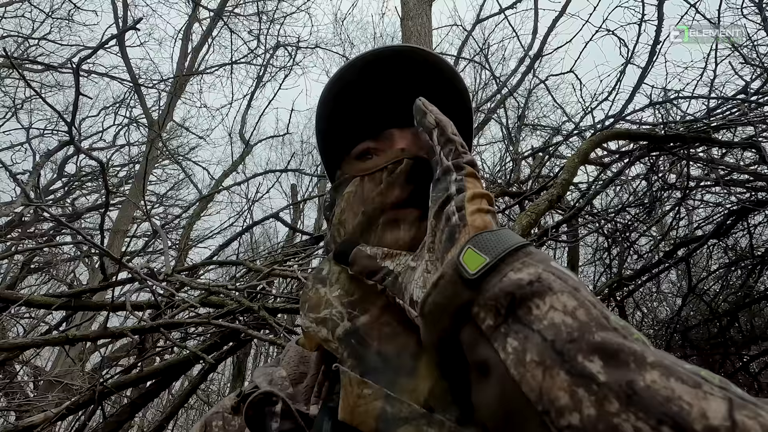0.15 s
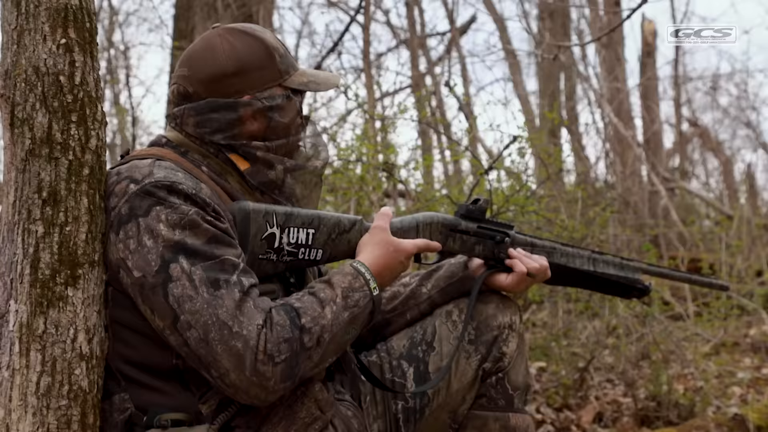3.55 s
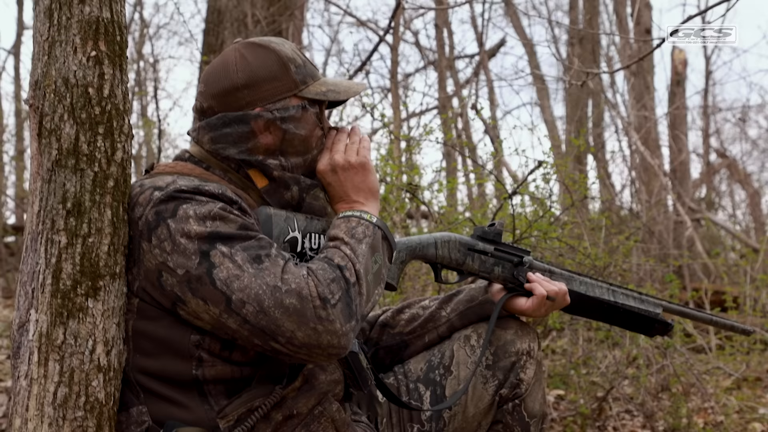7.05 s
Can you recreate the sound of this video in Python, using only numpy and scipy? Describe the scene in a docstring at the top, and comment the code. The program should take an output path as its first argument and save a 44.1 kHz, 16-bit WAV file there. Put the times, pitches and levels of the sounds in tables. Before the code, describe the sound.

Twelve short, raspy hen turkey yelps from a reed mouth call come about three a second over near silence. Leaf hiss and soft wind rumble rise, a faraway tom gobbles in chopped, rattling notes, and a thin insect trill appears with dry twig ticks. A lower, clearer run of yelps starts quietly and grows strong and close, then a second distant gobble follows. Bare spring woods, slight echo, wind bumping the microphone.

```python
"""A raspy run of hen turkey yelps from a latex reed call in the mouth, then a clearer, nearer run.
Reed partials, stuttering and slipping, mix with gated air noise. A far tom gobbles back after each run:
chopped short notes. A far bird whistles once; leaf hiss and an insect trill rise after the first run.
Shaped noise makes the wind on the microphone; twigs and gear tick and knock. Echoes leave a faint tail in
bare spring woods."""
import sys
import numpy as np
from scipy import signal
from scipy.fft import rfft, irfft, next_fast_len
from scipy.io import wavfile
from scipy.ndimage import uniform_filter1d

SR = 44100
rng = np.random.default_rng(int(sys.argv[2]) if len(sys.argv) > 2 else 0)


def volts_from_decibels(level):
    """Turn decibel levels (scalar or array-like) into linear amplitude factors."""
    exponent = np.asarray(level, float) / 20
    return 10 ** exponent


def transcribe(signal):
    """Save signal, clipped to [-1, 1], as a 16-bit WAV file at the path in sys.argv[1]."""
    frames = np.atleast_2d(signal).T
    limited = np.clip(frames, -1, 1)
    pcm = np.round(limited * 32767).astype(np.int16)
    wavfile.write(sys.argv[1], SR, pcm)


N = 393660

# The yelps of each run, before the manner below bends them:
# start_s, length_s, effort_db, pitch_hz, sag_hz_per_s, reed_steadies_s, reed_breaks_s (both after the start)
RASPY_YELPS = [(-.035, .097, -18.5, 810, 600, .02, .068), (.321, .101, -16.5, 782, 450, .004, .085),
               (.665, .095, -16, 765, -700, .012, .08), (.972, .091, -17, 775, -250, .032, .078),
               (1.284, .093, -17, 785, 120, .008, .088), (1.603, .098, -17, 800, -700, .005, .06),
               (1.922, .098, -18, 810, 100, .032, .065), (2.236, .101, -16, 802, 220, .035, .095),
               (2.578, .093, -16.5, 825, 350, .022, .083), (2.920, .1, -17.5, 820, 50, .07, .071),
               (3.254, .097, -17, 840, 50, .06, .061), (3.577, .103, -18.5, 860, 100, .035, .06)]
CLEAR_YELPS = [(6.305, .045, -26, 600, 250, .014, .04), (6.590, .052, -10.5, 678, 1000, .004, .05),
               (6.858, .053, -10.5, 652, 250, .004, .05), (7.117, .073, -5.5, 640, 650, .025, .07),
               (7.405, .071, -5.5, 634, 380, .017, .068), (7.676, .077, -2.5, 636, 150, .024, .056),
               (7.976, .077, -2, 655, 250, .023, .036), (8.302, .072, -7, 690, 800, .02, .07)]
# Manner of a run: rise_s, fall_s, silence_db, level_before_steadying_db, level_after_breaking_db,
# swell_db_per_s (positive swells, negative fades), pitch_lift (share of pitch), settling_s,
# rasp_steady (0-1), rasp_unsteady (0-1), puff_db, waver_db, growth of the unsteady rasp from yelp to yelp
RASPY_MANNER = (.006, .018, -30, -2, -3.5, 25, .05, .004, .31, .6, 4, 2.1, .03)
CLEAR_MANNER = (.006, .019, -24, -14, -1.5, -75, .19, .007, .11, .55, 1, .5, .025)
# Mouth and cupped hand, for the reed tone and for the rasp: frequency_hz, relative level_db
RASPY_TONE = [(780, -23.5), (1560, 2), (2340, -17.5), (3120, -37.5), (3900, -31.5), (4680, -33),
              (5460, -52.5), (7020, -54), (9360, -55), (12480, -64)]
RASPY_AIR = [(400, -76.5), (650, -42), (930, 1), (1200, -6.5), (1600, 15), (1900, 3), (2400, -22.5),
             (3100, -50.5), (4300, -8.5), (5000, -25), (5900, -54.1), (7800, -45.5), (11000, -44.5),
             (14000, -65)]
CLEAR_TONE = [(640, -15), (770, -23), (1260, -0.5), (1890, -17.5), (2520, -29.5), (3150, -34.5),
              (3780, -47), (4410, -54.5), (5670, -55)]
CLEAR_AIR = [(400, -42.5), (650, -21), (1050, -12.5), (1300, 2), (1600, -15), (2000, -13.5), (3500, -50.5),
             (8000, -68.5)]
# Gobbles, before distance softens them: start_s, effort_db, stretch in time (a ratio)
GOBBLES = [(4.054, -32, 1.0), (8.614, -25, 1.08)]
# Course of a gobble, before stretching: time_s, level_db, pitch_hz, throat_resonance_hz
GOBBLE_COURSE = [(0, -1, 590, 1650), (.085, 0, 612, 1700), (.11, -3, 650, 1290), (.17, -8, 645, 1290),
                 (.19, -6, 530, 1050), (.25, -3, 535, 1040), (.33, -9, 570, 640), (.41, -9, 500, 960),
                 (.6, -12, 505, 940), (.8, -14, 540, 1300), (.93, -34, 560, 1700), (1.08, -19, 590, 1780),
                 (1.17, -22, 600, 1780)]
# Throat of the tom: frequency_hz, relative level_db
TOM_THROAT = [(450, -11), (600, -5), (1050, -2), (1800, -2), (2300, -7), (3000, -11), (4000, -8),
              (5000, -15), (7000, -43)]
# Fading of echoes in the trees: frequency_hz, relative fading time (a ratio, scaled for each sound)
TREE_FADING = [(500, 1.1), (1500, 0.9), (3000, 0.3), (8000, 0.43)]
# Glide of the far bird: time_s, pitch_hz, level_db
BIRD_GLIDE = [(.06, 820, -76), (.1, 890, -71), (.22, 885, -72), (.33, 840, -74), (.42, 790, -75),
              (.52, 770, -80)]
# Overtone colour of the bird: frequency_hz, relative level_db
BIRD_TONE = [(900, -30), (2650, -12), (3550, 0), (4450, -24), (5350, -14), (7100, -15), (8000, -30)]
# Insect trill, farther insects, and a swelling mid-range wash: time_s, pitch_hz, level_db
TRILL = [(4.65, 3850, -59), (5.2, 3870, -48), (6.1, 3870, -50), (6.4, 3800, -51), (7.4, 3790, -56)]
CHORUS = [(4.4, 3433, -51.5), (5.6, 3570, -51.5), (7.4, 3500, -52.5)]
WASH = [(3.36, 1500, -64), (3.5, 1300, -55), (3.75, 1000, -48), (3.85, 900, -52), (4.05, 800, -53)]
# Dry ticks of twigs and gear: start_s, peak_db, centre_hz
TICKS = [(3.391, -52, 3770), (3.401, -42, 4200), (4.986, -27, 3900), (5.044, -27, 3300), (5.765, -23, 3000),
         (5.815, -34, 2500), (6.095, -44, 2200), (6.298, -33, 2800), (6.811, -30.5, 2400),
         (7.038, -27, 3300), (7.494, -32, 3600)]
# Hollow knocks: start_s, level_db, pitch_hz, fading_s (time to drop 60 dB)
KNOCKS = [(3.866, -31, 319, 0.14), (3.899, -39, 345, 0.23), (4.67, -27, 278, 0.053)]
# Course of the wind: time_s, rumble_db, gust_db, leaf_hiss_db
WIND = [(0, -50, -78.5, -87), (2, -54, -81, -79.5), (3.1, -49, -94.5, -79), (3.5, -50, -51, -57),
        (4, -48, -50, -57), (4.6, -38, -76, -47.5), (5.2, -44, -61, -46.5), (5.9, -44.5, -33.5, -45),
        (6.55, -43, -39.5, -47.5), (6.65, -46, -41, -46), (7.25, -36, -36, -45.5),
        (7.9, -44.5, -44.5, -46.5), (8.93, -40, -59.5, -45)]
# Colours of rumble, gusts and leaf hiss: frequency_hz, relative level_db
RUMBLE = [(20, -16), (55, 4), (95, -0.5), (200, -19), (500, -63), (1100, -120)]
GUST = [(35, -41.5), (80, -0.5), (290, 3), (550, -11.5), (1600, -27), (3300, -90)]
LEAVES = [(300, -2.5), (1000, -8.5), (2000, -13.5), (3500, -15.5), (6000, -20.5), (9000, -26.5),
          (12000, -35.5), (15000, -44)]

FLIP_S = .005  # time the reed takes to steady or break
PUFF_S = .016  # length of the opening puff
ONSET_S, ONSET_DB_PER_S = .014, 900  # faint swell ahead of each yelp
FULL_LEAD_S = .022  # a reed that steadies this late or later gets the full pitch lift
NOTES_PER_S, LATE_NOTES_PER_S, SLOWING_S = 14, 6.4, .3  # pace of gobble notes


def evened(x):
    """Scales a sound to an average (rms) strength of 1."""
    return x / np.sqrt(np.mean(x ** 2) + 1e-20)


def read(points, hz):
    """Reads a spectrum between its points on a log-frequency axis."""
    f, value = np.transpose(points)
    return np.interp(np.log(hz + 1), np.log(f + 1), value)


def add(mix, start_s, sound):
    """Mixes a sound in at a time, leaving out what falls outside."""
    at = round(start_s * SR)
    sound = sound[max(-at, 0):]
    part = mix[max(at, 0):][:len(sound)]
    part += sound[:len(part)]


def columns(rows):
    """Gives the start time and the sample-by-sample curves of a table."""
    s, *values = np.transpose(rows)
    t = np.arange(s[0], s[-1], 1 / SR)
    return [s[0]] + [np.interp(t, s, v) for v in values]


def wobble(count, rate_hz):
    """A smooth random curve of rms 1: noise with its changes faster than the rate filtered down."""
    b, a = signal.butter(2, rate_hz, fs=SR)
    smooth = signal.lfilter(b, a, rng.standard_normal(count + 2000))
    return evened(smooth)[2000:]  # skips the filter's start


def coloured(x, points):
    """Filters a sound by a spectrum, then evens it."""
    hz = np.fft.rfftfreq(len(x), 1 / SR)
    return evened(irfft(rfft(x) * volts_from_decibels(read(points, hz)), len(x)))


def stack(turns, hz, points, first=1, count=16, peak_hz=1, peak_db=0):
    """Partials of a vibration, each as loud as the resonator and one moving resonance make it."""
    total = 0
    for k in np.arange(count) + first:
        lift_db = peak_db * np.exp(-(np.log(k * hz / peak_hz) / 0.32) ** 2)
        level = volts_from_decibels(read(points, k * hz) + lift_db)
        total = total + level * np.cos(2 * np.pi * k * turns + k * k)
    return total


def shape(number, start, length, effort_db, hz, sag, steady, broken, manner):
    """Level, pitch and rasp of a yelp: high and hoarse, then steady and bending, then hoarse again."""
    (rise, fall, hush_db, lead_db, end_db, swell_db, lift, settle,
     calm, hoarse, puff_db, waver_db, growth) = manner
    t = np.arange(-ONSET_S, length, 1 / SR)
    lead = np.clip((steady - t) / FLIP_S + .5, 0, 1)
    end = np.clip((t - broken) / FLIP_S + .5, 0, 1)
    since = np.maximum(t - steady + FLIP_S, 0)
    edges = np.clip(1 - t / rise, 0, 1) + np.clip(1 - (length - t) / fall, 0, 1) ** 2

    level_db = effort_db + hush_db * edges + lead_db * lead + end_db * end + swell_db * since
    level_db += ONSET_DB_PER_S * np.minimum(t, 0)
    level_db += puff_db * np.exp(-(t / PUFF_S) ** 2) + waver_db * wobble(len(t), 45)

    lift *= min(steady / FULL_LEAD_S, 1)
    hz = hz * (1 + lift * np.exp(-since / settle)) - sag * since
    rasp = calm + (hoarse + growth * number - calm) * np.maximum(lead, end)
    return start - ONSET_S, level_db, hz, rasp


def yelp(curves, tone, air_colour, slip, stutter, rasp_db, beat, loose_hz, count):
    """The reed buzzes; when it rasps its pitch slips, its swing stutters and gated air noise joins."""
    start_s, level_db, hz, rasp = curves
    rasp, n = np.clip(rasp, 0, 1), len(hz)
    hz = hz * (1 + (0.0057 + slip * rasp ** 2) * wobble(n, 110) + .17 * slip * wobble(n, 320))
    turns = np.cumsum(hz) / SR
    # the reed can swing only so far, but often stalls
    swing = np.tanh(1.84 + stutter * rasp ** 2 * wobble(n, 80))
    reed = stack(turns, hz, tone, count=count)
    # alternate strong and weak beats add tones halfway between the partials
    reed += beat * stack(turns, hz, tone, first=3 / 2, count=4)
    reed /= np.sqrt(uniform_filter1d(reed ** 2, 400) + 1e-9)

    gate = 0.25 + np.exp(-(turns % 1) / 0.32)  # air bursts once per reed cycle
    air = coloured(gate * rng.standard_normal(n), air_colour)
    # the loose second reed flaps at its own rate
    flap = np.cumsum(loose_hz * (1 + 0.036 * wobble(n, 87))) / SR
    loose = (1 + .6 * wobble(n, 76)) * np.sin(2 * np.pi * flap)

    clean = np.sqrt(1 - rasp ** 4) * reed * swing
    rough = volts_from_decibels(rasp_db) * rasp ** 2 * (air + 0.76 * rasp * loose)
    ramp = np.minimum(np.minimum(np.arange(n), n - np.arange(n)) / 100, 1)
    return start_s, volts_from_decibels(level_db) * (clean + rough) * ramp


def limited(raspy):
    """The recorder's limiter holds down the peaks of the raspy run; a high-pass removes the bass."""
    size = abs(signal.hilbert(raspy, next_fast_len(N))[:N]) / 0.38 + 1e-9
    raspy = raspy * np.tanh(size) / size
    return signal.sosfilt(signal.butter(5, 600, "high", fs=SR, output="sos"), raspy)


def gobble(start_s, top_db, stretch):
    """Short unsteady notes that slow down and draw apart, chopped by a fast rattle of the throat."""
    _, level_db, hz, throat_hz = columns(np.array(GOBBLE_COURSE) * [stretch, 1, 1, 1])
    n = len(hz)
    early = np.exp(-np.arange(n) / SR / SLOWING_S)
    pace = LATE_NOTES_PER_S + (NOTES_PER_S - LATE_NOTES_PER_S) * early
    beat = np.cumsum(pace) / SR % 1
    notes = .1 + .5 * early + np.sin(np.pi * beat ** .6) ** 2
    rattle_turns = np.cumsum(58 * (1 + .25 * wobble(n, 20))) / SR  # about 58 Hz
    rattle = 1 + .6 * np.sin(2 * np.pi * rattle_turns)

    hz = hz * (1 + .015 * wobble(n, 19) + 0.02 * wobble(n, 250))
    turns = np.cumsum(hz) / SR
    voice = stack(turns, hz, TOM_THROAT, count=10, peak_hz=throat_hz, peak_db=9 + 5 * early)
    voice /= np.sqrt(uniform_filter1d(voice ** 2, 800) + 1e-12)
    air = coloured(rng.standard_normal(n), TOM_THROAT)
    sound = (voice * (1 + .4 * wobble(n, 80)) + .4 * air) * notes * rattle
    return start_s, volts_from_decibels(top_db + level_db) * sound * signal.windows.tukey(n, .015)


def trees(x, start_s, fade_s):
    """Sparse echoes off trunks, each band dying at its own speed."""
    taps = np.zeros(SR)
    at = np.arange(round(start_s * SR), SR - 20, 20)
    taps[at + rng.integers(0, 20, len(at))] = rng.choice([-1., 1.], len(at))
    hz, t, z = signal.stft(taps, SR, nperseg=256)
    fading_s = fade_s * read(TREE_FADING, hz)[:, None]  # time to drop 60 dB
    tail = signal.istft(z * volts_from_decibels(-60 * t / fading_s), SR, nperseg=256)[1]
    return signal.fftconvolve(x, tail / np.linalg.norm(tail))[:N]


def bird():
    """A faint gliding whistle with overtones."""
    start_s, hz, level_db = columns(BIRD_GLIDE)
    n = len(hz)
    hz = hz * (1 + .004 * wobble(n, 30) + .012 * wobble(n, 200))
    level_db = level_db + 3 * wobble(n, 60)
    whistle = stack(np.cumsum(hz) / SR, hz, BIRD_TONE, count=9)
    return start_s, volts_from_decibels(level_db) * whistle * signal.windows.tukey(n, .2)


def thin_tone(rows, fuzz_hz):
    """A wavering tone; faster random flutter spreads it into a wider band."""
    start_s, hz, level_db = columns(rows)
    n = len(hz)
    flutter = wobble(n, fuzz_hz) + 1j * wobble(n, fuzz_hz)
    tone = (flutter * np.exp(2j * np.pi * np.cumsum(hz) / SR)).real
    return start_s, volts_from_decibels(level_db) * tone * signal.windows.tukey(n, .1)


def tick(peak_db, hz, fading_s):
    """A crack of noise around one broad resonance."""
    t = np.arange(4000) / SR
    crack = rng.standard_normal(len(t)) * volts_from_decibels(-60 * t / fading_s)
    crack = signal.lfilter(*signal.butter(2, [hz / 1.6, hz * 1.5], "band", fs=SR), crack)
    return volts_from_decibels(peak_db) * crack / abs(crack).max()


def knock(level_db, hz, fading_s):
    """A blow on a hollow thing rings one mode, which dies away."""
    t = np.arange(8000) / SR
    attack = np.minimum(t / 0.00094, 1)
    return volts_from_decibels(level_db - 60 * t / fading_s) * np.sin(2 * np.pi * hz * t) * attack


def wind():
    """Rumble and gusts on the microphone and hiss of leaves: coloured noise in lumpy patches."""
    frames, hz = N // 256 + 5, np.fft.rfftfreq(1024, 1 / SR)
    s, *levels = np.transpose(WIND)
    out = np.zeros(N)
    for colour, level_db, lumps_db in zip((RUMBLE, GUST, LEAVES), levels, (2.2, 2.3, 1.1)):
        a, b, patches = rng.standard_normal((frames, 513, 3)).T
        # smooth the patches over frequency, then over time
        patches = evened(uniform_filter1d(uniform_filter1d(patches, 8, 0), 14, 1))
        z = (a + 1j * b) * volts_from_decibels(read(colour, hz)[:, None] + lumps_db * patches)
        noise = signal.istft(z, nperseg=1024, noverlap=768)[1][:N]
        out += evened(noise) * volts_from_decibels(np.interp(np.arange(N) / SR, s, level_db))
    return out


def scene():
    """Two runs of yelps, two gobbles, wind and small sounds."""
    raspy, clear, tom, small = np.zeros((4, N))
    for k, row in enumerate(RASPY_YELPS):
        curves = shape(k, *row, RASPY_MANNER)
        add(raspy, *yelp(curves, RASPY_TONE, RASPY_AIR, slip=.08, stutter=4.5, rasp_db=1,
                         beat=0, loose_hz=935, count=16))
    for k, row in enumerate(CLEAR_YELPS):
        curves = shape(k, *row, CLEAR_MANNER)
        add(clear, *yelp(curves, CLEAR_TONE, CLEAR_AIR, slip=.04, stutter=3.85, rasp_db=-4.5,
                         beat=.035, loose_hz=1040, count=9))
    for row in GOBBLES:
        add(tom, *gobble(*row))
    add(small, *bird())
    add(small, *thin_tone(WASH, 550))
    add(small, *thin_tone(TRILL, 28))
    add(small, *thin_tone(CHORUS, 330))
    for s, *row in TICKS:
        add(small, s, tick(*row, fading_s=0.029))
    for s, *row in KNOCKS:
        add(small, s, knock(*row))

    raspy = limited(raspy)
    near_echo = volts_from_decibels(-28) * np.roll(clear, round(0.04 * SR))
    far = volts_from_decibels(-6) * tom + volts_from_decibels(-5) * trees(tom, .005, .5)
    tails = volts_from_decibels(-42.5) * trees(raspy, 0.0071, 1.0) + volts_from_decibels(-35.5) * trees(clear, 0.045, 1.5)
    return (raspy + clear + near_echo + tails + far + small + wind())[None]


def top_cut(x):
    """Nothing passes above the cut-off."""
    return signal.sosfilt(signal.butter(12, 15700, fs=SR, output="sos"), x)


def record(dry):
    """The recorder clips whatever goes past full scale, as the loudest yelps do."""
    clipped = np.clip(dry, -1, 1)
    return top_cut(clipped)


dry = scene()
out = record(dry)
transcribe(out)
```